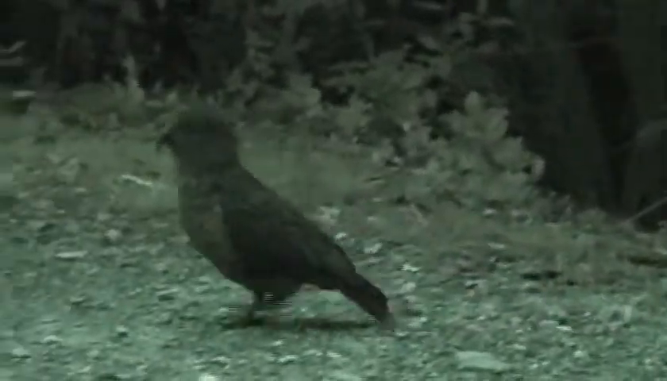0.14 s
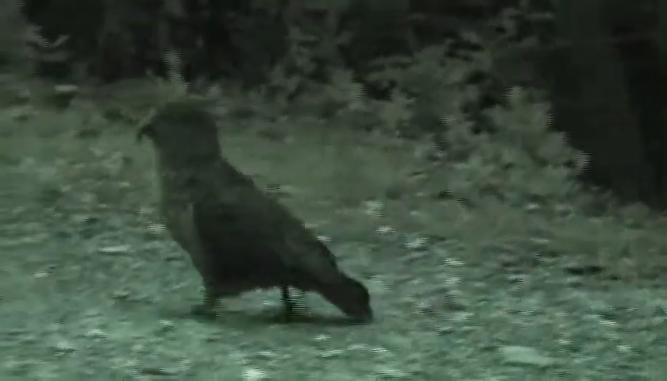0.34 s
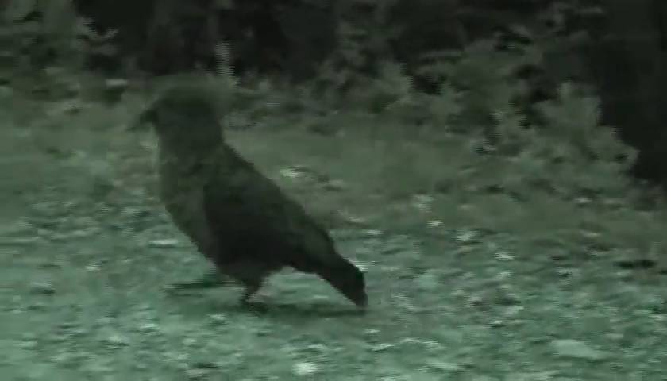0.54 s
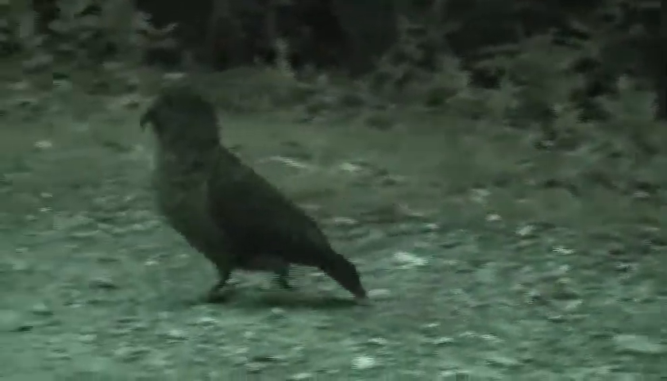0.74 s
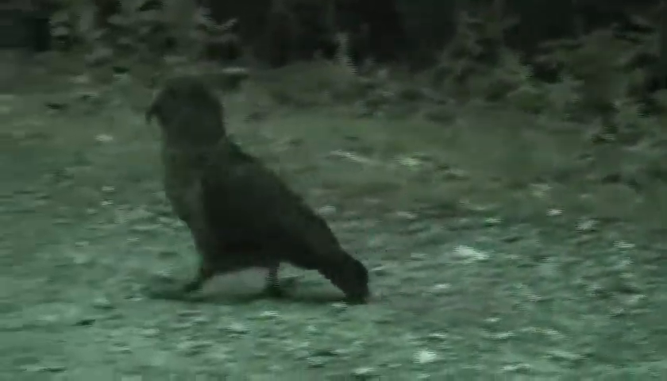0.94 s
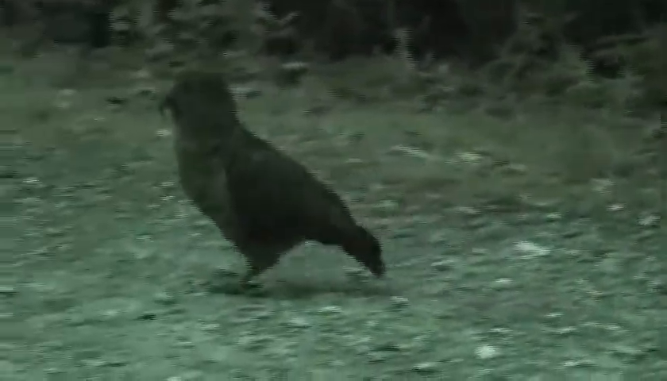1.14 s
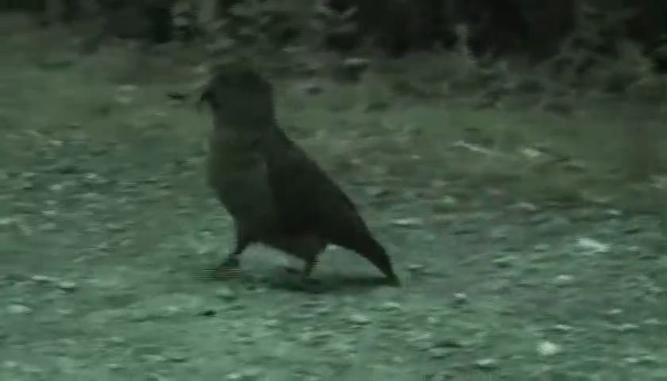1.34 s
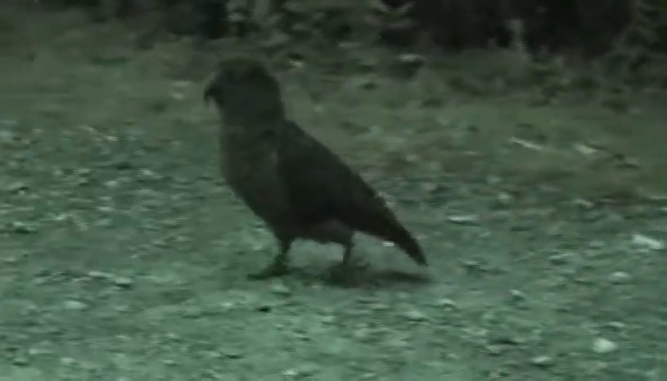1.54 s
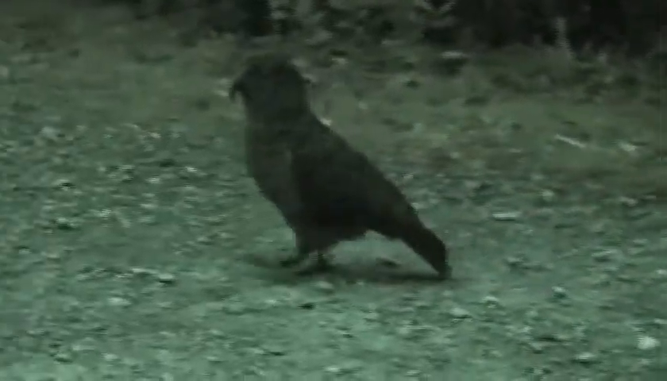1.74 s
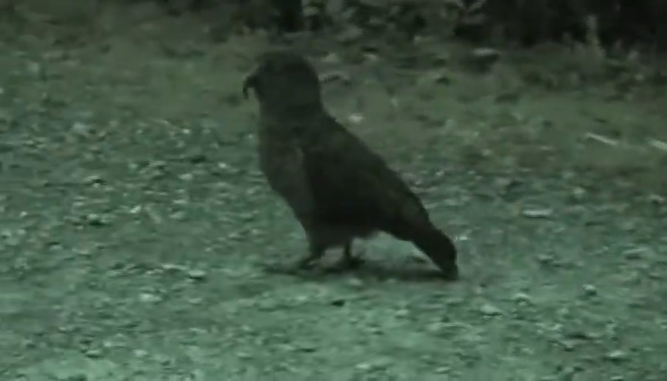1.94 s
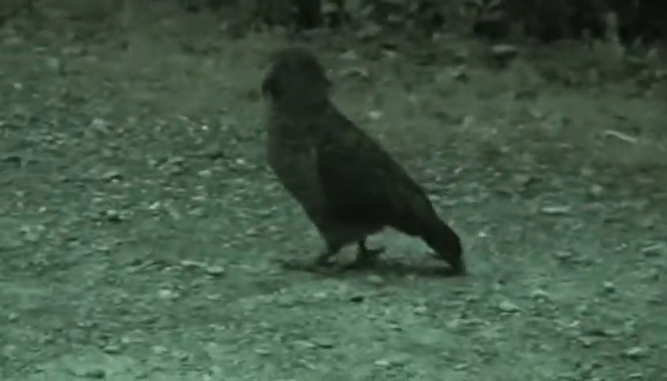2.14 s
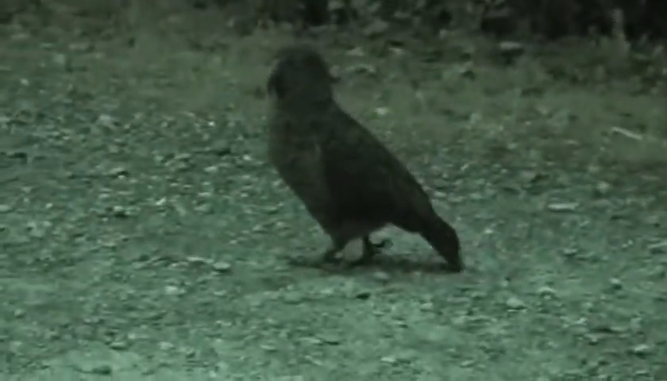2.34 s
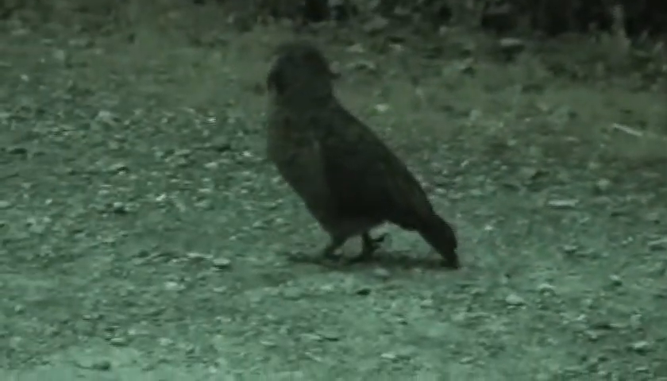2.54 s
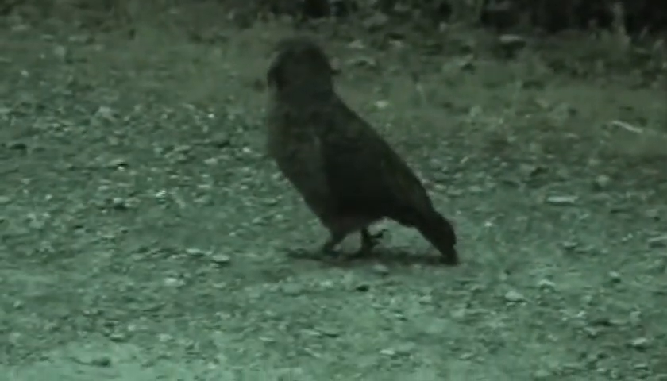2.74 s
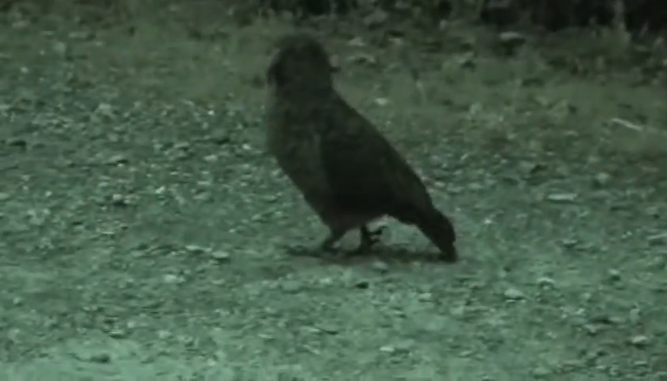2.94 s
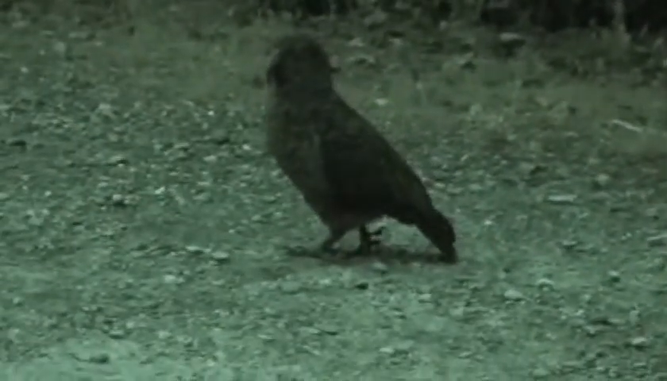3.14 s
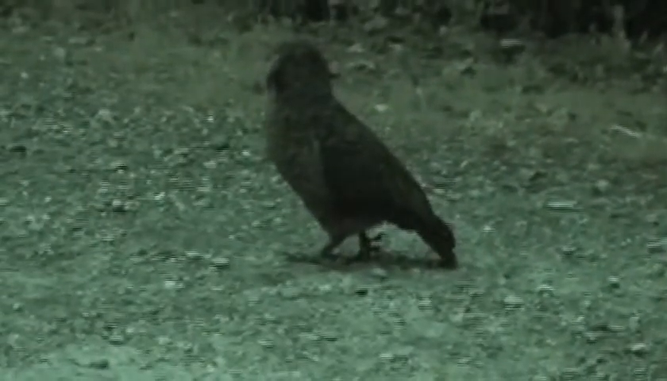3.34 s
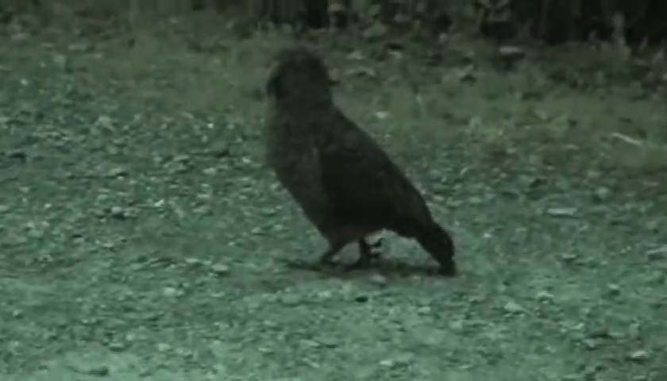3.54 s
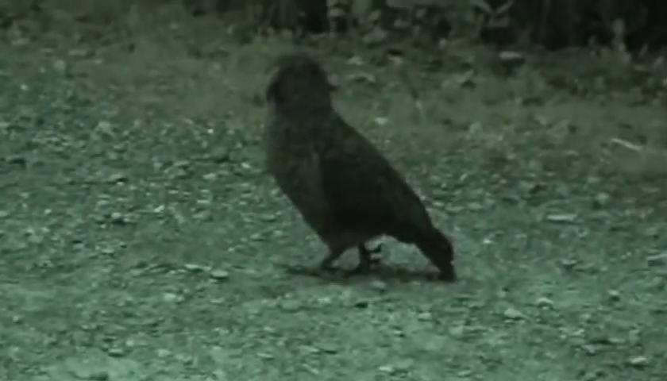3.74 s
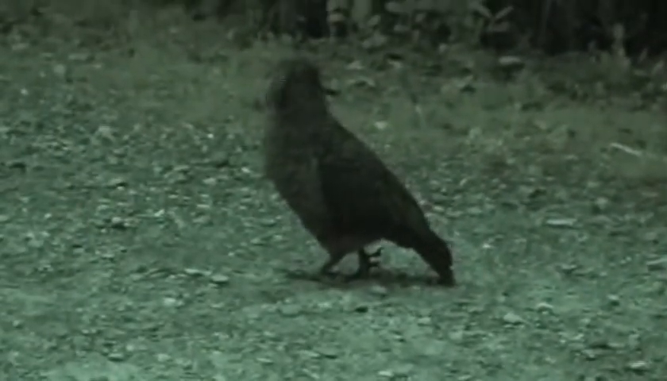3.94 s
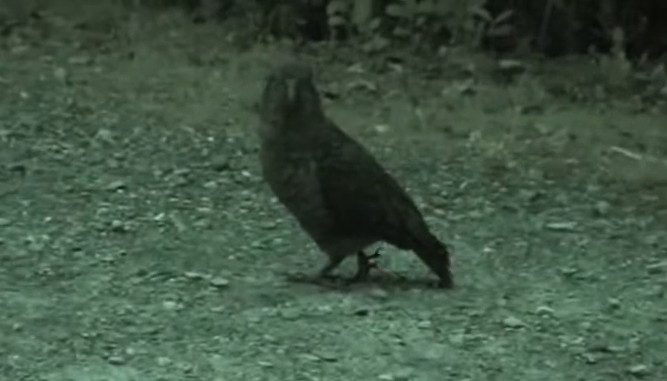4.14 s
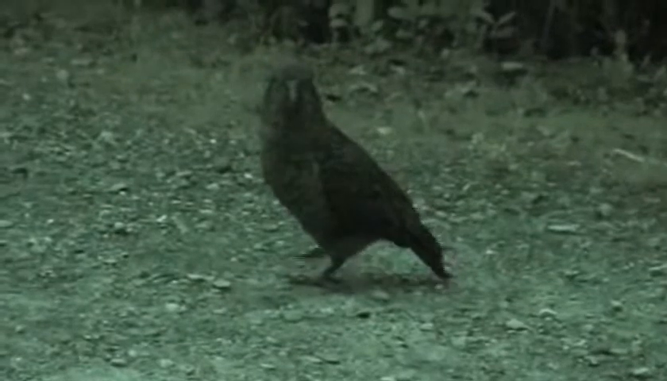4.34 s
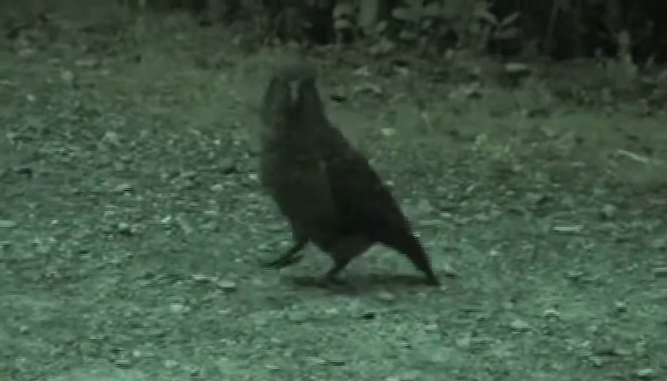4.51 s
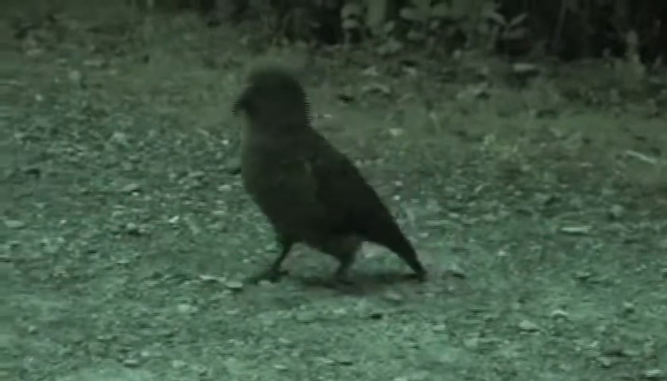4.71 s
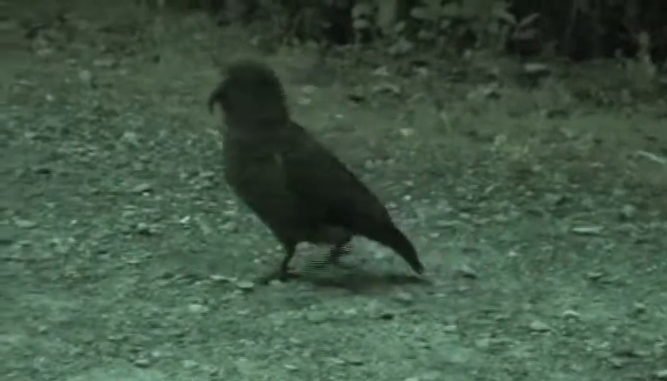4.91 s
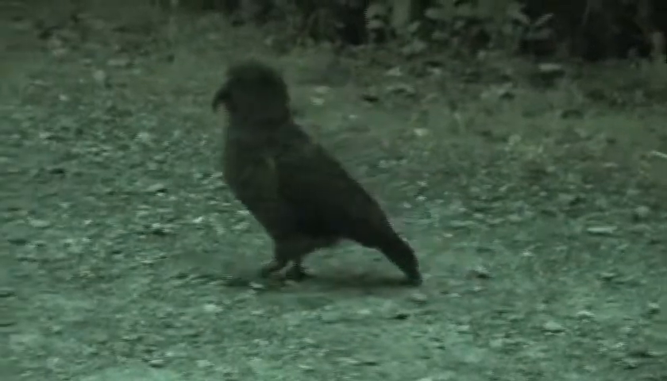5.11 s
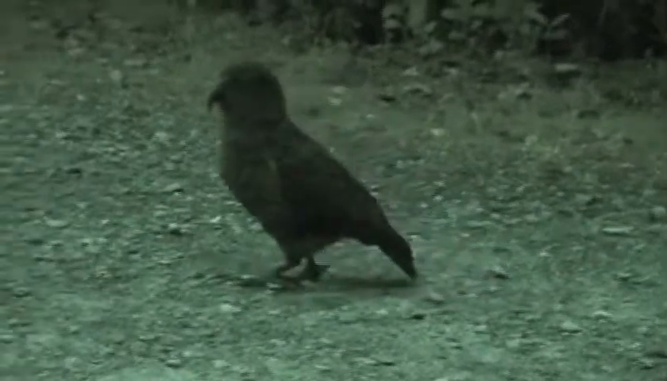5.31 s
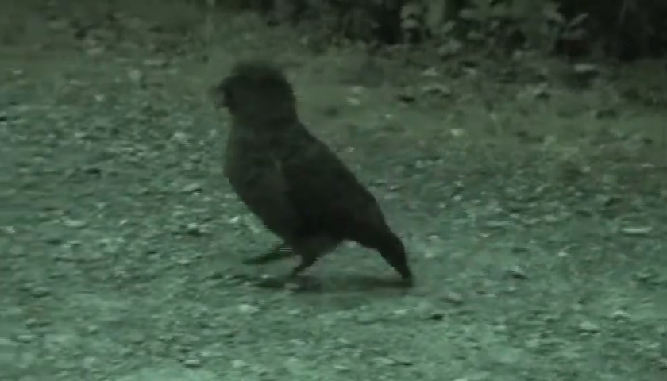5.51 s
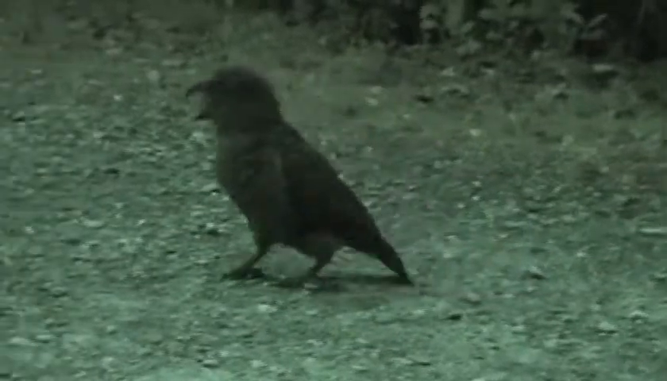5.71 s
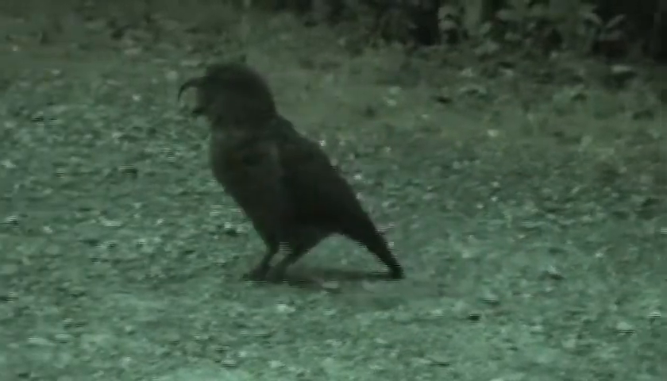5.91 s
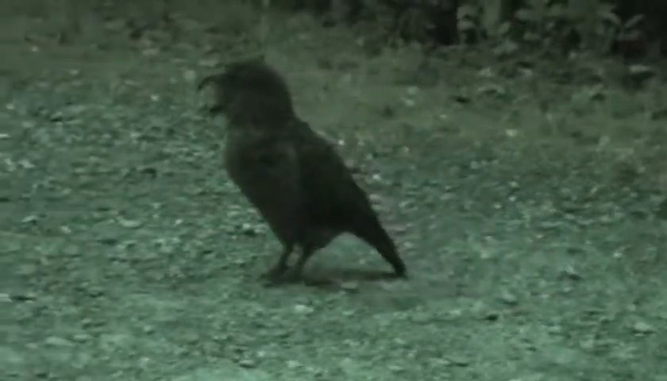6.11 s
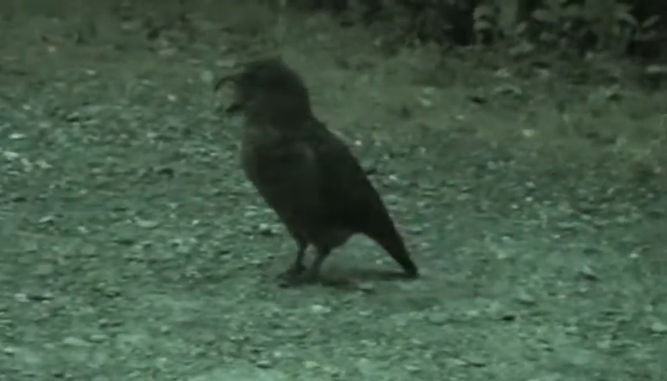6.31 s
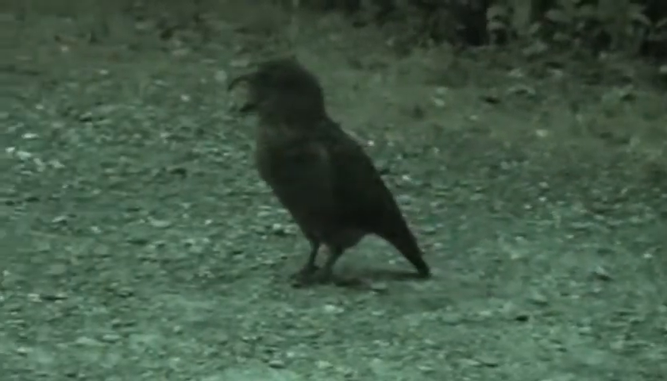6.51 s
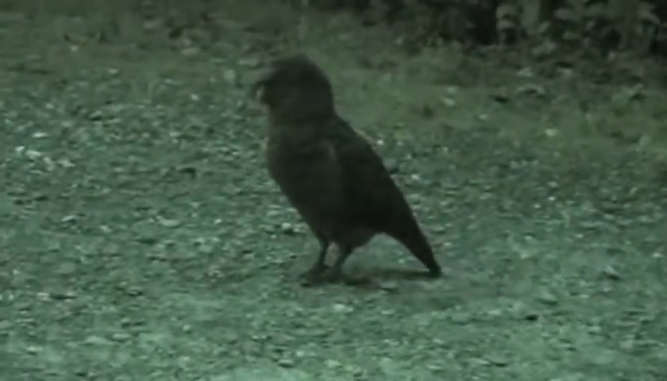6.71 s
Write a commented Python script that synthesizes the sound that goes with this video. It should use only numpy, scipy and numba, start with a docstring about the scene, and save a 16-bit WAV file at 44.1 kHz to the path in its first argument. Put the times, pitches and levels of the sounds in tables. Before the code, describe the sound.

A faint, steady outdoor rush with a trace of microphone hiss runs throughout, as in a quiet forest at night. From the start, small birds far off among the trees give scattered soft whistles, and one repeats a thin, very high phrase a little more often than once a second. A faint twitter and a few chips come between about 2.7 and 4 seconds. Soft scuffs and dull thuds on gravel occur around 2.2, 2.6 and 5.2 seconds. At about 5.6 seconds a parrot, close and straight ahead, gives a single loud, hoarse cry, far louder than everything else. It quavers rapidly through its first half, then slides down in pitch and weakens, ending at about 6.7 seconds with a short, light echo from the trees. The background dips as the cry begins and stays lower afterwards.

```python
"""On a gravel track in the forest at night, a kea gives one long, loud cry that quavers, then falls away.
Its syrinx tone catches about 18 times a second in the first half; beak and throat shape the harmonics,
and rushing air adds a rasp. Small birds whistle far off among the trees, with a few soft scuffs.
Under it all lies a faint steady rush that the camera's gain control ducks during the cry."""
import sys
import numpy as np
from scipy import signal
from scipy.fft import rfft, irfft
from scipy.io import wavfile
from scipy.ndimage import uniform_filter1d
from numba import njit

SR = 44100
rng = np.random.default_rng(int(sys.argv[2]) if len(sys.argv) > 2 else 0)


def store_wav(level_fs):
    """Save 16-bit WAV to argv[1]."""
    pcm = np.round(np.clip(np.atleast_2d(level_fs), -1, 1) * 32767)
    wavfile.write(sys.argv[1], SR, pcm.T.astype(np.int16))


N = 298116
TIME = np.arange(N) / SR
TOP_HZ = 13550
SIDE = np.array([[1], [-1]])  # adds to the left, subtracts from the right


# the cry, held and then falling: (time [s], pitch [Hz], relative level [dB], treble against body [dB])
CRY_CONTOUR = [(5.626, 1158, -16.5, -6.5), (5.66, 1147, -8, -10.5), (5.75, 1124, -8.5, -12),
               (5.86, 1112, -9, -15), (5.97, 1077, -10.5, -10.5), (6.03, 1088, -11, -10.5),
               (6.185, 1008, -12, -8), (6.26, 1023, -12.5, -7.5), (6.33, 978, -12, -12.5),
               (6.375, 945, -12, -18), (6.415, 873, -18.5, -8.5), (6.51, 817.5, -14.5, -18),
               (6.64, 692, -18.5, -19.5)]
# the voice starts harsh, clears, roughens through the last catches: (time [s], hoarseness [0-1])
HOARSENESS = [(5.62, .7), (5.68, 1), (5.74, .45), (5.87, .45), (6.2, 1), (6.32, .75), (6.65, .62)]

def kea(jitter=.0085, quaver=.0012, shimmer=.0098, gain_db=3):
    """The lead voice: a hoarse syrinx tone glides down through the throat's resonances."""
    times, *curves = np.transpose(CRY_CONTOUR)
    pitch_hz, level_db, bright_db = (np.interp(TIME, times, curve) for curve in curves)
    hoarse = np.interp(TIME, *np.transpose(HOARSENESS))
    opening, flick, surge = catches()
    envelope, bend, dull_db = cry_envelope()
    bright_db += dull_db
    # no two cycles are equally long, which blurs the high harmonics most
    wobble = hoarse * (jitter * wander(1500) + quaver * wander(84))
    pitch_hz = pitch_hz * bend * (1 + flick + .27 * surge + wobble)
    phase = 2 * np.pi * np.cumsum(pitch_hz) / SR
    voice = press(syrinx(phase, pitch_hz, hoarse), bright_db)
    voice *= opening * (1 + 1.17 * surge) * (1 + shimmer * hoarse * wander(700))
    rasp = beak_rasp(phase, opening, hoarse, bright_db)
    return (voice + rasp) * undb(level_db + gain_db) * envelope


# resonances of the throat and open beak: (frequency [Hz], gain [dB])
THROAT_EQ = [(700, -19), (1050, -19), (1400, -26.5), (1700, -6), (2300, 1.5), (2650, -2.5), (2900, 0),
             (4250, -21), (4520, -26.5), (5100, -7.5), (6750, -17.5), (7350, -31), (8600, -16.5),
             (13400, -46)]

def syrinx(phase, pitch_hz, hoarse, flicker_db=2.3):
    """Up to twenty harmonics sound through the throat; the upper ones flicker most in level."""
    tone = np.zeros(N)
    for k in range(1, 21):
        unsteady = hoarse * np.clip((k - 1) / 5, .15, 1)
        flicker = undb(flicker_db * unsteady * (wander(21) + wander(290)))
        tone += flicker * np.cos(k * phase) * (k * pitch_hz < TOP_HZ)
    return colour(tone, THROAT_EQ)


def press(tone, bright_db, crossover_hz=4800):
    """A harder-pressed syrinx closes more sharply: more treble edge at the same overall level."""
    body = signal.sosfiltfilt(signal.butter(8, crossover_hz, fs=SR, output="sos"), tone)
    edge = tone - body
    body, edge = (band / np.sqrt(uniform_filter1d(band ** 2, 900) + 1e-12) for band in (body, edge))
    return (body + undb(bright_db) * edge) / np.sqrt(1 + undb(2 * bright_db))


def catches(first_s=5.7195, period_s=.05455, count=10, rebound_s=.01, surge_edge_s=.002):
    """Each catch chokes the syrinx and flicks the pitch up; the held air then escapes in a surge."""
    opening, flick, surge = np.ones(N), np.zeros(N), np.zeros(N)
    # catch by catch they get shorter and deeper, and the pitch jumps further
    half_widths_s = np.geomspace(.006, .0029, count)
    depths = np.linspace(.49, .57, count)
    jumps = np.linspace(.025, .16, count)
    half_widths_s[4], depths[4] = .00624, .99  # the fifth breaks the voice off
    for k, (half_s, depth, jump) in enumerate(zip(half_widths_s, depths, jumps)):
        t = TIME - first_s - k * period_s
        abruptness = .84 + 3.7 * depth ** 4
        opening *= 1 - depth * np.exp(-np.abs(t / half_s) ** abruptness)
        # the tone sags into the catch and rebounds out of it
        opening *= undb(t / rebound_s * np.exp(-(t / rebound_s) ** 2 / 2))
        flick += jump * np.exp(-2 * (t / half_s) ** 2)
        surge += jump * (np.tanh((t - .00227) / surge_edge_s) - np.tanh((t - .021) / surge_edge_s)) / 2
    return opening, flick, surge


def cry_envelope(start_s=5.605, end_s=6.657, attack_s=.018, release_s=.0069):
    """The voice scoops up to pitch as it sets in, then droops and dulls as the pressure runs out."""
    since, left = np.maximum(TIME - start_s, 0), np.maximum(end_s - TIME, 0)
    envelope = np.minimum(since / attack_s, 1) * np.minimum(left / release_s, 1)
    scoop = .28 * np.exp(-since / .006)
    droop = .16 * np.exp(-left / .0068)
    dull_db = -9 * np.exp(-left / .02)
    return envelope, 1 - scoop - droop, dull_db


# air rushing through the beak: (frequency [Hz], gain [dB])
RASP_EQ = [(900, -26), (1400, -45), (2300, -9.5), (3200, -3), (4200, -10), (5600, -5), (7200, -21),
           (8600, -1.5), (13400, -29)]

def beak_rasp(phase, opening, hoarse, bright_db):
    """Air pulses with each cycle, rasping more under pressure and while the syrinx is nearly shut."""
    air = noise(RASP_EQ, 0) * (1 + .88 * np.cos(phase))
    pressed = undb(-18 + bright_db / 2) * hoarse
    choked = undb(-21) * 6 * opening * np.maximum(1 - opening, 0) ** 2
    return air * (pressed + choked)


def far_birds(waver=.0054):
    """Near-pure, softly wavering notes, each given as (time, length, start pitch, end pitch, level)."""
    notes = whistles() + chips() + twitter() + chorus() + thin_phrases()
    out, vibrato = np.zeros(N), 1 + waver * wander(57)
    for start, length, from_hz, to_hz, db in notes:
        span = (TIME >= start) & (TIME < start + length)
        progress = (TIME[span] - start) / length
        pitch_hz = (from_hz + (to_hz - from_hz) * progress) * vibrato[span]
        envelope = np.sqrt(np.pi * np.abs(np.sin(np.pi * progress)))
        out[span] += undb(db) * envelope * np.sin(2 * np.pi * np.cumsum(pitch_hz) / SR)
    return out


# far birds' whistles: (time [s], length [s], pitch [Hz], level [dB])
WHISTLE_CUES = [(.107, 0.059, 2207, -47), (.185, .13, 1552, -56.5), (1.568, .09, 1908, -60),
                (2.43, .12, 2160, -54), (2.62, .096, 2154, -61), (2.83, .06, 2800, -61),
                (3.959, .045, 4470, -61), (4.54, 0.14, 1825, -50.5), (4.89, 0.049, 2145, -50.5)]

def whistles():
    """Single notes, each held on one pitch."""
    return [(start, length, hz, hz, db) for start, length, hz, db in WHISTLE_CUES]


# entries of the phrase: (time [s], level [dB])
PHRASE_CUES = [(0.2, -54.5), (1.01, -54), (1.81, -54.5), (2.63, -53.5), (3.42, -56), (4.21, -60),
               (5.03, -58)]
# its notes: (delay [s], length [s], start pitch [Hz], end pitch [Hz], relative level [dB])
PHRASE_NOTES = [(0, 0.046, 6430, 6600, -10), (.05, 0.068, 6720, 6680, -8), (.16, 0.14, 6440, 6970, -15.5),
                (.53, .08, 7480, 7500, -17)]

def thin_phrases():
    """A small bird repeats one thin, high phrase."""
    return [(start + delay, length, from_hz, to_hz, db + note_db)
            for start, db in PHRASE_CUES for delay, length, from_hz, to_hz, note_db in PHRASE_NOTES]


# another bird's chips: (time [s], level [dB])
CHIP_CUES = [(3.1, -62), (3.45, -61), (3.73, -67), (3.99, -65)]

def chips(length_s=.055, from_hz=4300, to_hz=4030):
    """Short notes that slide down."""
    return [(start, length_s, from_hz, to_hz, db) for start, db in CHIP_CUES]


def twitter(start_s=2.715, period_s=.036, tick_s=.017, hz=4960, rise=.057, db=-63):
    """One bird gives a quick, even run of four rising ticks."""
    from_hz, to_hz = hz * (1 - rise / 2), hz * (1 + rise / 2)
    return [(start_s + k * period_s, tick_s, from_hz, to_hz, db) for k in range(4)]


# the faintest birds:
# (rate [notes/s], length [s], lowest pitch [Hz], highest pitch [Hz], widest glide [share], level [dB])
CHORUS_VOICES = [(2.2, .06, 7350, 7550, .01, -70), (1.1, .08, 3400, 6200, .07, -70),
                 (.7, .09, 1850, 2400, .02, -64)]

def chorus():
    """Faint notes loosely spread in time, each with its own random pitch and slide."""
    notes = []
    for rate, length, low_hz, high_hz, glide, db in CHORUS_VOICES:
        for k, (when, pitch, slide) in enumerate(rng.random((int(rate * N / SR), 3))):
            hz = low_hz + (high_hz - low_hz) * pitch
            notes.append(((k + when) / rate, length, hz, hz * (1 + glide * (2 * slide - 1)), db))
    return notes


# soft scuffs and thuds: (time [s], length [s], centre [Hz], level [dB])
SCUFF_CUES = [(2.24, 0.1, 174, -54.5), (2.248, 0.082, 515, -49), (2.629, 0.039, 577, -51),
              (5.201, 0.062, 139, -51.5), (5.232, 0.065, 5500, -62), (5.322, 0.026, 5600, -54.5)]

def scuffs():
    """Rounded swells of band noise: dull thuds down low, light gritty scrapes up high."""
    out = np.zeros(N)
    for start, length, hz, db in SCUFF_CUES:
        progress = np.clip((TIME - start) / length, 0, 1)
        swell = np.sqrt(2 * np.abs(np.sin(np.pi * progress)) ** 1.8)
        band = [(hz / 4, -30), (hz / 1.7, -2), (hz, 0), (hz * 1.1, -3), (hz * 6, -60)]
        out += swell * noise(band, db)
    return out


# tone of the forest's reverb: (frequency [Hz], gain [dB])
FOREST_EQ = [(500, 11.5), (2500, 0), (5000, 9), (9000, -8), (13000, -77)]

def forest_reverb(x, t60_s, send_db, predelay_s=.004, width=.35):
    """Ground and trunks scatter a sound back, differently to each side."""
    t = TIME[:SR]
    decay = undb(-60 * t / t60_s) * (t > predelay_s)
    decay /= np.linalg.norm(decay)
    tails = [colour(rng.standard_normal(SR) * decay, FOREST_EQ) for _ in range(2)]
    mid, side = (signal.fftconvolve(x, tail)[:N] for tail in tails)
    return undb(send_db) * (mid + width * side * SIDE)


# the night's rush, centre and sides: (frequency [Hz], gain [dB])
RUSH_MID_EQ = [(15, -47), (25, -4.5), (124, -0.5), (339, -1.5), (482, -1), (972, -4), (1280, -7),
               (2010, -9), (2220, -10), (2400, -11), (3240, -16), (5480, -23), (6700, -23), (7980, -25.5),
               (10000, -26), (13000, -35), (22000, -120)]
RUSH_SIDE_EQ = [(15, -51), (25, -21), (71, -14.5), (545, -3.5), (1140, -3), (2050, -8), (2210, -8),
                (2510, -10.5), (5390, -18.5), (7320, -18), (11000, -23), (14300, -50), (22000, -120)]
# microphone hiss: (frequency [Hz], gain [dB])
HISS_EQ = [(6000, -25), (8800, -6), (8970, 12), (9150, -21), (11100, -1), (11600, 6.5), (13500, 4.5),
           (15000, -35)]

def night_bed(mid_db=-47, side_db=-53, hiss_db=-65.5, drift_db=.4):
    """A far, even rush, mostly alike on both sides, and the microphone's own hiss."""
    mid = noise(RUSH_MID_EQ, mid_db) * undb(drift_db * wander(1.4))
    return mid + noise(HISS_EQ, hiss_db) + noise(RUSH_SIDE_EQ, side_db) * SIDE


def undb(db):
    """Decibels to gain."""
    return 10 ** (np.asarray(db) / 20)


def at_level(x, db):
    """Scale to an rms level."""
    return x * undb(db) / np.sqrt(np.mean(x ** 2))


def colour(x, eq, size=8192):
    """Causal EQ through (frequency [Hz], gain [dB]) points, built from the cepstrum of its log gain."""
    hz, db = np.transpose(eq)
    bins = np.maximum(np.fft.rfftfreq(size, 1 / SR), 1)
    gain = undb(np.interp(np.log(bins), np.log(hz), db))
    cepstrum = irfft(np.log(gain))
    cepstrum[1:size // 2] *= 2
    cepstrum[size // 2 + 1:] = 0
    impulse = irfft(np.exp(rfft(cepstrum)))
    return signal.fftconvolve(x, impulse)[:len(x)]


def noise(eq, db):
    """Coloured noise at an rms level."""
    return at_level(colour(rng.standard_normal(N), eq), db)


def wander(rate_hz):
    """Smooth random modulation with an rms of 1."""
    window = max(int(SR / rate_hz), 1)
    smoothed = uniform_filter1d(rng.standard_normal(N), window)
    return at_level(uniform_filter1d(smoothed, window), 0)


@njit
def follow_peaks(x, attack, release):
    """Envelope follower that rises fast and sinks slowly."""
    out, envelope = np.empty(len(x)), 0.
    for i in range(len(x)):
        envelope += (x[i] - envelope) * (attack if x[i] > envelope else release)
        out[i] = envelope
    return out


def scene(port_lag_s=8e-6):
    """The kea close by and nearly straight ahead, the other birds deep among the trees."""
    cry, birds = kea(), far_birds()
    # the cry reaches one microphone port a moment before the other
    spread = port_lag_s / 2 * SR * np.gradient(cry) * SIDE
    ground = forest_reverb(cry, t60_s=.14, send_db=-20)
    trees = forest_reverb(cry, t60_s=.57, send_db=-23.5)
    # only the low whistles carry far enough to ring on between the trunks
    low_whistles = colour(birds, [(2400, 0), (4000, -8)])
    ring = forest_reverb(low_whistles, t60_s=.9, send_db=-5.5)
    return cry + spread + ground + trees + birds + ring + scuffs() + night_bed()


def record(dry, ceiling=.88, lookahead_samples=60, attack_s=.00016, release_s=32, low_cut_hz=28):
    """The camera ducks its gain just ahead of loud peaks, recovers slowly and cuts rumble and top end."""
    upcoming = np.roll(np.abs(dry).max(axis=0), -lookahead_samples)
    peak = follow_peaks(upcoming, 1 / (attack_s * SR), 1 / (release_s * SR))
    ducked = dry * ceiling / np.maximum(peak, ceiling)
    low_cut = signal.butter(2, low_cut_hz, "high", fs=SR, output="sos")
    high_cut = signal.ellip(10, .2, 80, TOP_HZ, fs=SR, output="sos")
    return signal.sosfilt(high_cut, signal.sosfilt(low_cut, ducked))


dry = scene()
out = record(dry)
store_wav(out)
```